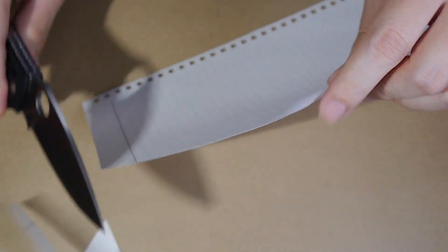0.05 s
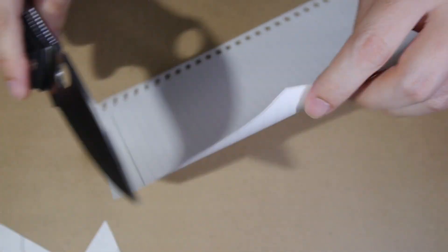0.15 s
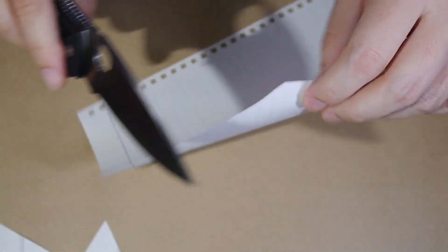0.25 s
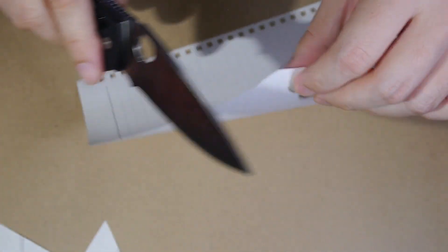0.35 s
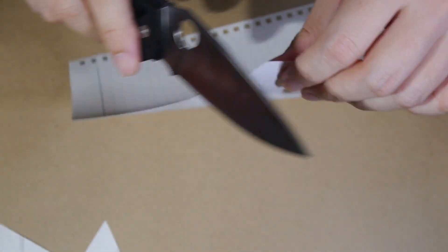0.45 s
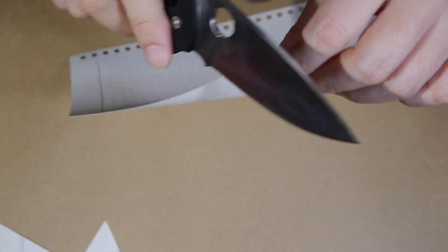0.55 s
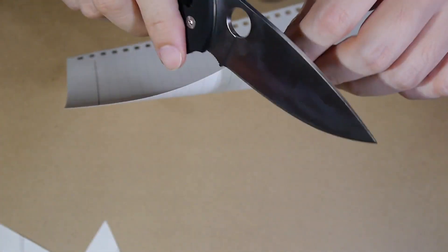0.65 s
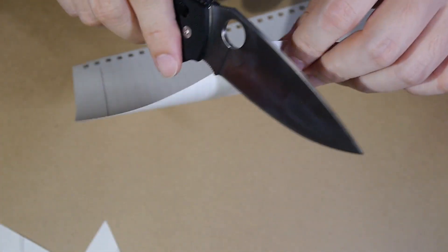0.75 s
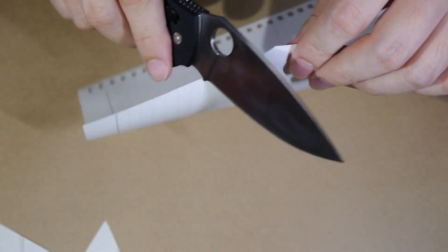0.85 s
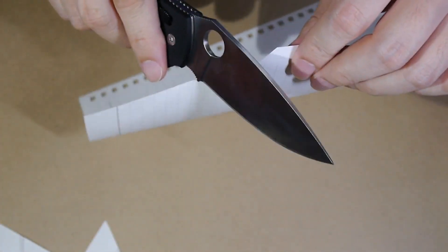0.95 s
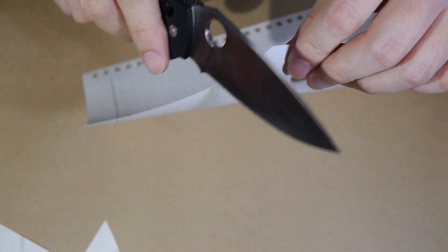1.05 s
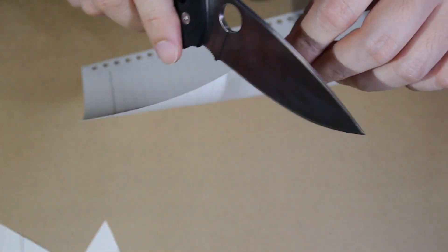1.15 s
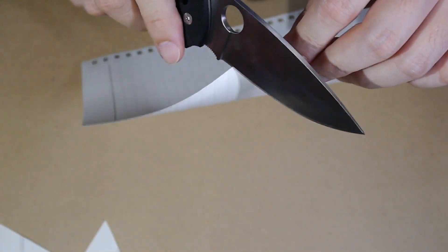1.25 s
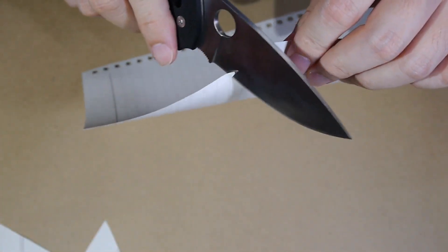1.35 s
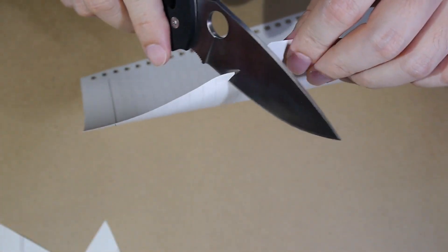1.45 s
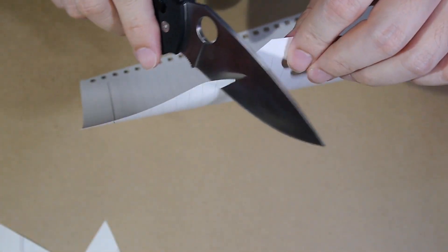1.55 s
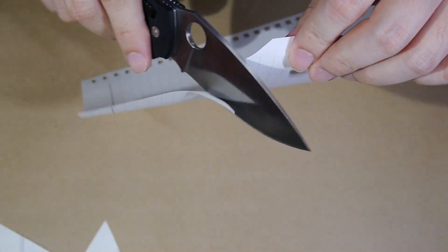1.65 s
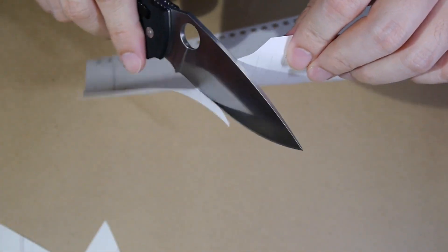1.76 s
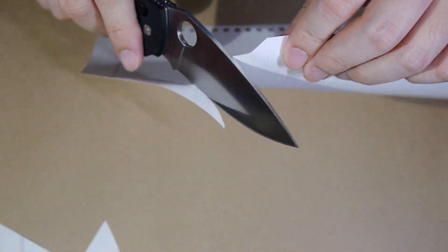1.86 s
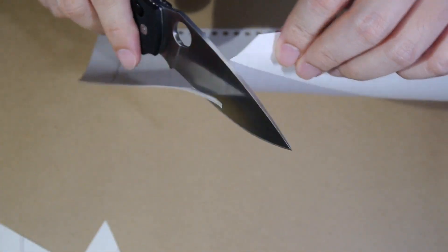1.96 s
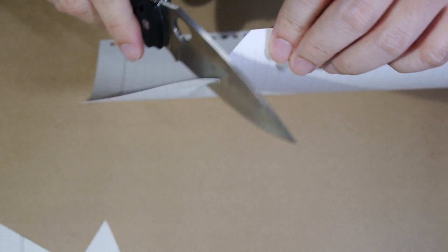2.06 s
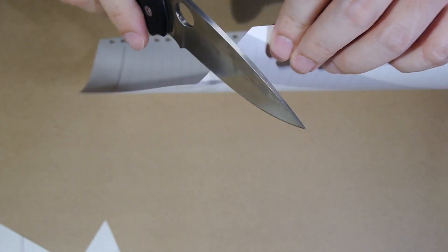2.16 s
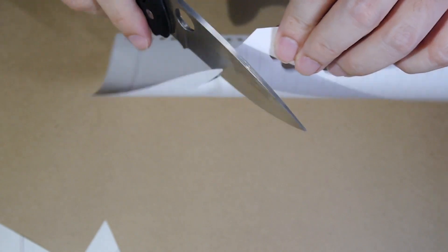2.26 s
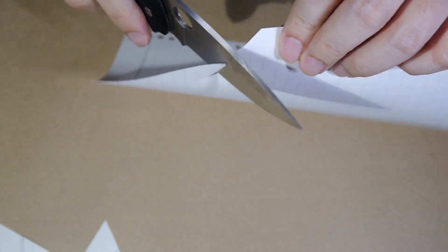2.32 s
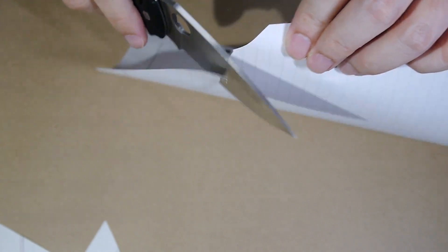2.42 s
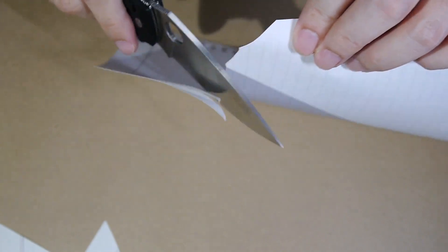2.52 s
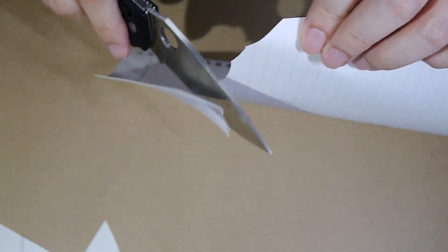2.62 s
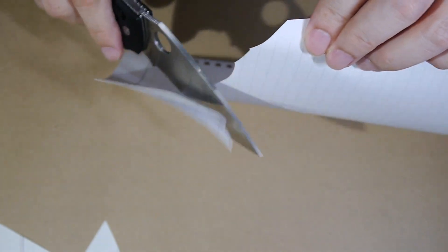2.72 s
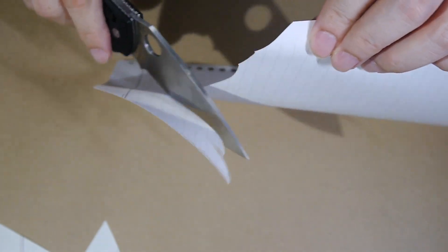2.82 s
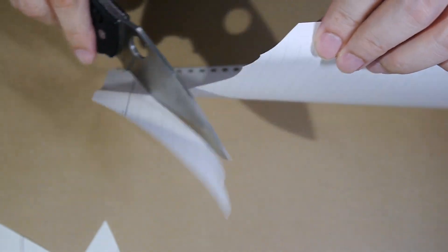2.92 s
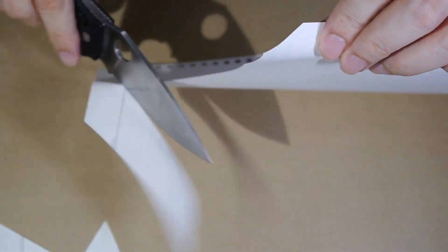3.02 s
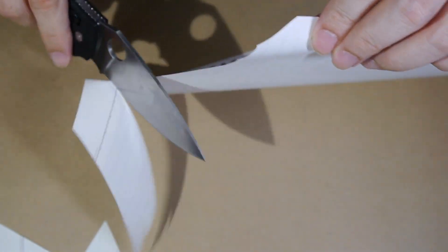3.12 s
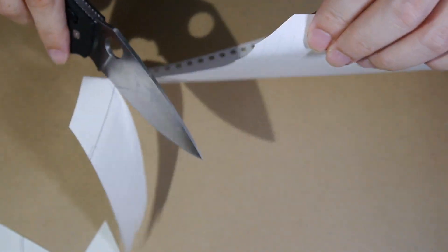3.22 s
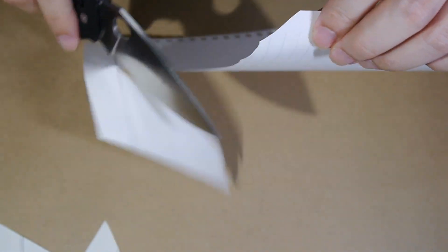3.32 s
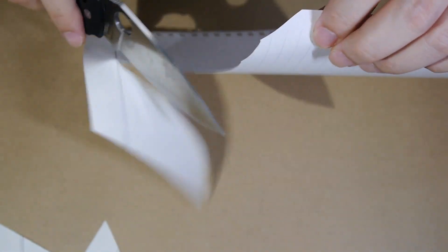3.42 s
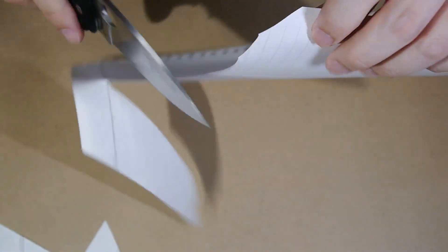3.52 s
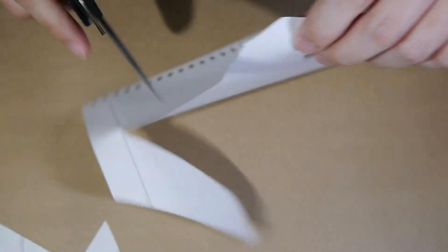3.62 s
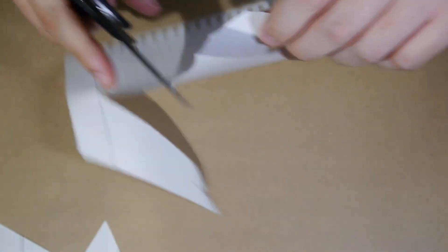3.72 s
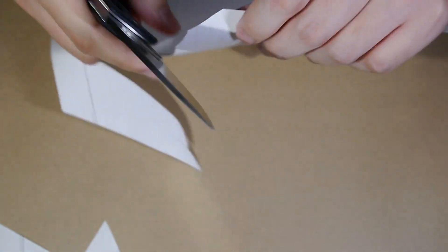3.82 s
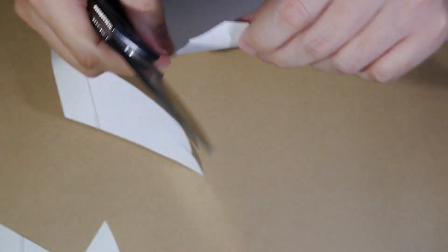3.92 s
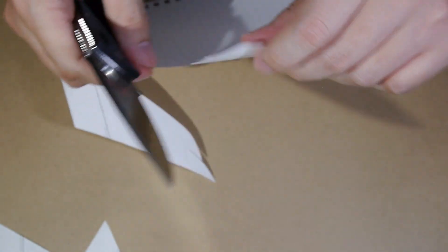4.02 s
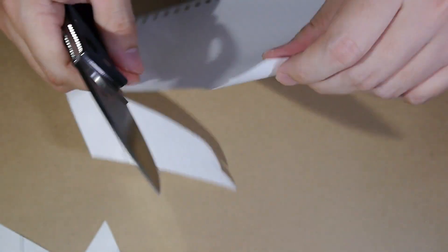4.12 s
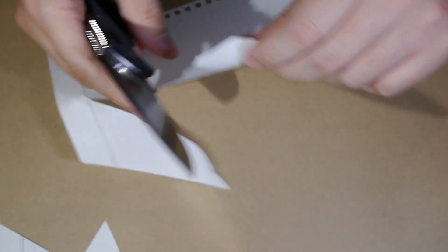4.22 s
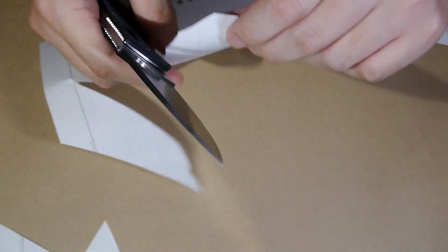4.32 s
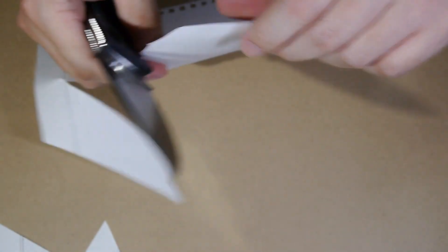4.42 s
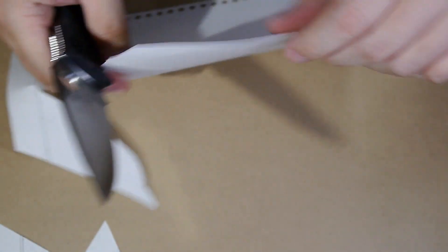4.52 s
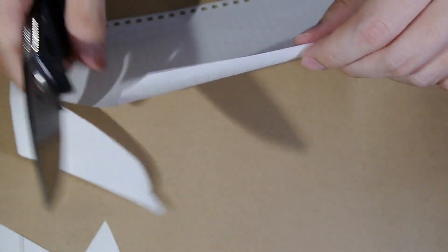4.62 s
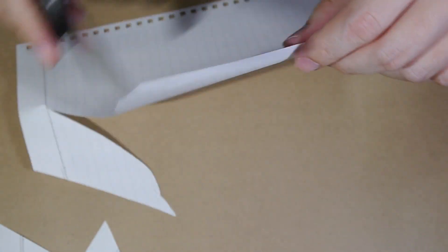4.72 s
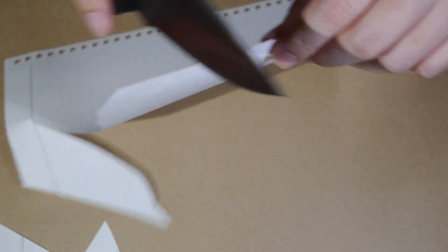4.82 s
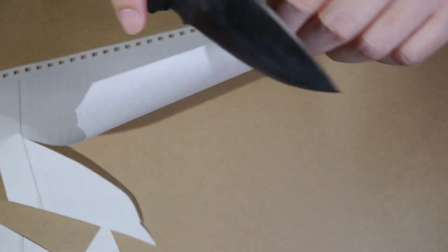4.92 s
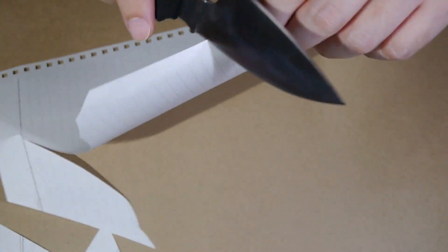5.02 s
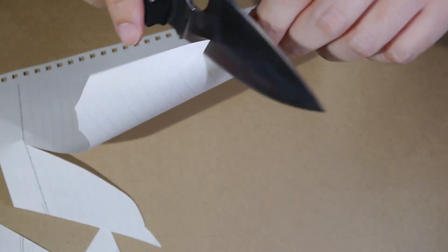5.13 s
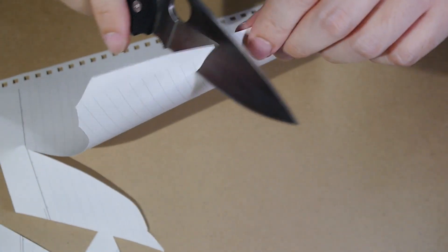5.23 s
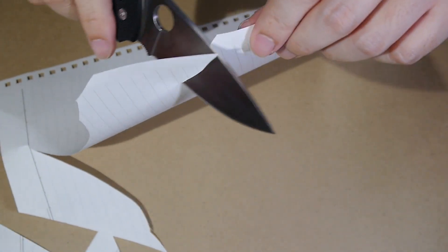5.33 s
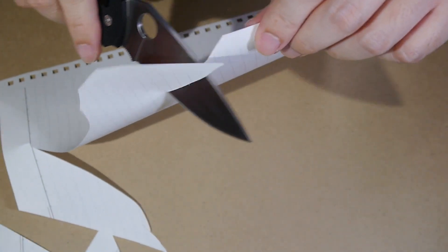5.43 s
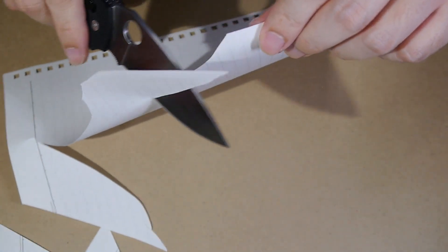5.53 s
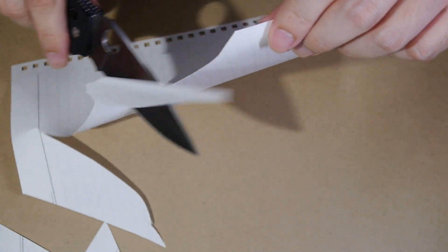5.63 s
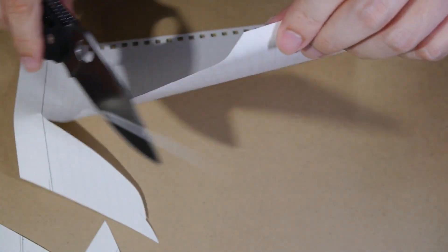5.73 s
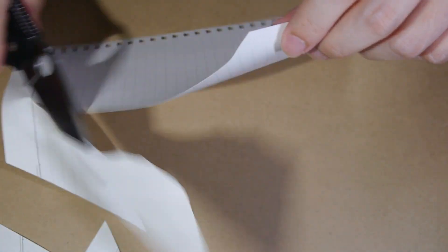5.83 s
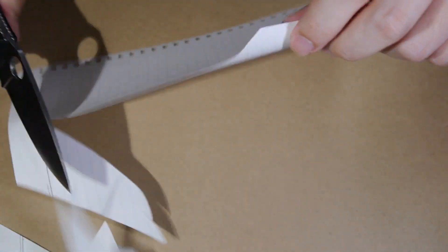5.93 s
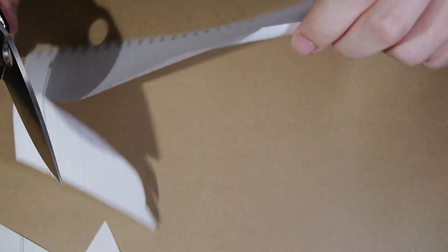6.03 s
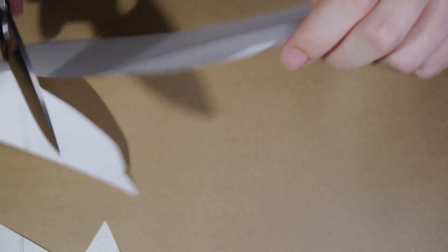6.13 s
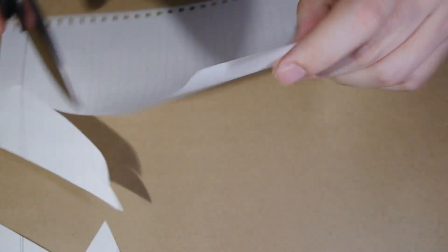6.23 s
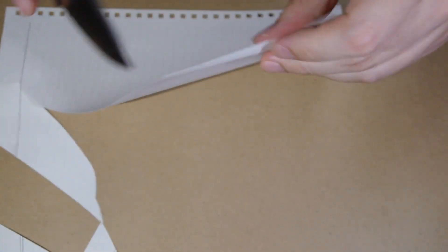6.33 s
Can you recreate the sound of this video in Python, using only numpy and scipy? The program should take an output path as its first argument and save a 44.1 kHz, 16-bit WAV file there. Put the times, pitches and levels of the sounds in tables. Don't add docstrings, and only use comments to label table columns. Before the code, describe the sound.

Dry, close stereo capture of paper being sliced indoors. Fine fibres snap so densely that each stroke becomes a rasping hiss with papery resonance and low flutter. Quiet nicks and aiming rubs come first, followed by two long cuts, a stretch of gentle finger rustling and soft bumps, then a final cut that brightens into a quick tear. Small taps and slides follow. A faint steady hum and soft room noise lie underneath.

```python
import sys
import numpy as np
from scipy import signal
from scipy.fft import rfft, irfft, next_fast_len
from scipy.io import wavfile
from scipy.ndimage import uniform_filter1d, map_coordinates

SR = 44100
rng = np.random.default_rng(int(sys.argv[2]) if len(sys.argv) > 2 else 0)


def elevation(decibels):
    levels = np.asarray(decibels, float)
    return 10 ** (levels / 20)


def log_audio(samples):
    frames = np.atleast_2d(samples).T
    limited = np.clip(frames, -1, 1)
    pcm = np.round(limited * 32767).astype(np.int16)
    wavfile.write(sys.argv[1], SR, pcm)


N = 280855

# t/s, fundamental level/dB, second harmonic level/dB
LAMP_HUM = [(0, -53, -68), (.14, -50.5, -65), (.55, -49.5, -63), (.94, -46, -52.5), (1.2, -50, -61.5),
            (1.28, -52.5, -68), (2.57, -56, -74), (3.69, -52, -76), (4.9, -52.5, -69), (6.37, -51, -69)]
# f/Hz, level/dB
AIR_COLOUR = [(12, -25), (20, -14), (50, -14.5), (85, -12), (150, -15.5), (400, -16), (800, -9.5),
              (1400, -21.5), (2500, -26), (4500, -29), (9500, -29), (13300, -36), (15300, -25.5)]
# f/Hz, side minus mid level/dB
AIR_SPREAD = [(60, -10), (300, -9), (730, -10), (1300, 1.5), (9000, -2), (15000, 2)]
# f/Hz, t60/s
ROOM_DECAY = [(200, 0.45), (2000, 0.091), (10000, 0.096)]
# f/Hz, width/Hz, level/dB
HOUSING_RESONANCES = [(1170, 150, 2), (1805, 83, 3), (2306, 217, 5), (3270, 590, -2.5), (4100, 100, 3),
                      (4960, 250, 6), (6160, 260, 1), (8300, 490, 1.5), (11380, 180, 1),
                      (1387, 270, -8), (2070, 110, 1), (2680, 130, -2), (3570, 240, -3.5), (4760, 140, -0.5),
                (5470, 150, 0)]
# f/Hz, side minus mid level/dB
PAPER_SPREAD = [(60, -8), (450, -16), (1200, -14.5), (2000, -10.5), (3300, -9.5), (5000, -9.5),
                (6200, -9.5), (9000, -12.5), (10500, -10.5), (13000, -2), (15000, 4)]
# f/Hz, left minus right level/dB
PORT_TILT = [(60, -1.5), (300, 0.5), (1200, -1.6), (3000, -1.8), (8000, -0.9), (13000, -0.7)]
# t/s, treble width level/dB
TREBLE_WIDTH = [(1.6, 1), (1.8, -8), (2.05, 2), (2.6, -4.5), (3.35, -8), (3.6, -5), (5.15, -2.5), (5.3, -3),
                (5.9, -10), (5.97, 3)]

# f/Hz, level/dB per Hz
FLAP_COLOUR = [(30, -70), (68, -18), (115, -4), (124, -7), (329, -6), (500, -5.5), (650, -2.5),
               (1100, -120)]
BEND_COLOUR = [(200, -19), (350, -20.5), (700, -2), (1150, -2), (1450, -2), (1800, -11), (3300, -120)]
RASP_COLOUR = [(760, -57), (1200, -14), (1450, 0.5), (2400, -2.5), (3500, 0), (4300, -16.5), (8000, -120)]
FIBRE_COLOUR = [(1880, -15.5), (3200, -0.5), (3700, -1.5), (4950, -4.5), (5390, -2.5), (7000, -5.5),
                (9100, -20), (15400, -120)]
EDGE_COLOUR = [(3530, -32), (6000, -5.5), (8050, -3.5), (9630, -2.5), (11400, -8), (13400, -18),
               (15300, -26)]

# t/s, peak level/dB, pitch f/Hz, crack level/dB, upper bends level/dB
EDGE_TAPS = [(0.169, -32.5, 670, 0.5, -12), (0.201, -28.5, 1390, -14, -7), (0.384, -22.5, 1200, -25, -17),
             (0.813, -22, 940, -39, -17), (1.116, -25, 1300, -10, 10.5), (1.335, -17, 917, -31, -3),
             (2.311, -27, 2380, -6, 5), (2.35, -20, 1140, -13, -15), (2.47, -13, 2380, -18, -4),
             (2.477, -17, 2370, -14, 5), (3.204, -22.5, 890, -13, -21), (3.401, -31.5, 610, 7, -15),
             (3.870, -24.5, 450, -15, -20), (3.951, -29, 427, -13, -17), (4.0, -29.5, 450, -13, -14),
             (4.496, -30.5, 1500, -14, -10), (4.529, -33, 2300, -0.5, -12), (4.683, -31, 1140, -4, -8),
             (4.673, -29, 1140, -9, -13), (5.125, -16, 755, -28, -1), (5.134, -33, 900, -13, -10),
             (6.047, -23, 2300, -17, -7), (6.112, -21, 645, -9, -16), (6.1367, -17.5, 2460, -20, -20),
             (6.296, -23, 1050, -21, -10), (6.306, -20, 1000, -22, -16)]
# t/s of peak, hiss level/dB, load
# level/dB, rise/s, fall/s
SHEET_SLIDES = [(.128, -41, -17, 0.043, 0.043), (.175, -42.5, -0.5, 0.014, 0.03),
                (.203, -44.5, 1.5, .008, 0.061), (.305, -40, -4, 0.11, 0.095),
                (.383, -40.5, -5, 0.041, 0.24), (.459, -42, -26, 0.17, 0.065), (.72, -56, 0, 0.93, 0.055),
                (1.1, -43, -15, 0.055, 0.21), (1.123, -42, 13.5, 0.028, 0.03),
                (1.21, -48, 0.5, 0.095, 0.022), (1.342, -50, 11, 0.0048, 0.041),
                (2.0, -42.5, -11, 0.34, 0.047), (2.111, -48, -7.5, 0.14, 0.11),
                (2.191, -46.5, -4.5, 0.099, 0.12), (2.298, -47.5, 12, .008, .05),
                (2.322, -31, -2.5, 0.033, 0.041), (2.38, -41.5, -14, 0.037, 0.14),
                (3.212, -31, -11, 0.041, 0.07), (3.25, -42, -6, .05, 0.47),
                 (3.407, -37, 1.5, 0.0082, 0.015), (3.423, -53, 8.5, .02, 0.15),
                 (3.6, -45.5, -11, 0.054, 0.47), (3.781, -32.5, -18, 0.16, 0.26),
                 (3.874, -53, 11.5, 0.012, 0.55), (3.987, -47, -1, 0.49, .33), (4.163, -55, 8.5, .01, 0.17),
                 (4.237, -39.5, -17, 0.12, 0.13), (4.321, -44.5, -5.5, 0.083, 0.16),
                 (4.397, -41, -19, 0.078, 0.16), (4.455, -45, -0.5, 0.076, 0.047),
                 (4.525, -36.5, -13, 0.054, 0.18), (4.6, -40.5, -20, 0.11, 0.17),
                 (4.676, -46, 5.5, 0.028, 0.06), (4.695, -42, -9, 0.26, 0.033), (4.74, -49, -4, .05, 0.14),
                 (4.779, -58.5, 11, 0.2, 0.059), (4.89, -47, -2.5, 0.11, 0.4),
                 (5.02, -44.5, -8.5, 0.22, 0.13), (5.133, -44, 15, 0.0056, 0.019)]
# t/s of peak, hiss level/dB, load level/dB, rise/s, fall/s
SETTLING_SLIDES = [
    (3.125, -28, 6, 0.03, 0.033),
    (5.922, -21.5, -16, 0.033, 0.027),
    (6.0, -45.5, -1, 0.044, 0.12),
    (6.064, -41, -11, 0.025, 0.48),
    (6.116, -41, 6.5, .015, 0.045),
    (6.143, -34.5, -4.5, 0.013, 0.092),
    (6.246, -38, -22, .08, 0.076),
    (6.299, -47.5, 15.5, 0.022, 0.071),
    (6.362, -40, 3, .08, 0.024),
]
# t/s, blade speed as hiss level/dB, sheet load level/dB, tension level/dB
SHORT_STROKES = [
    [(0.0, -21, -13.5, 3), (0.02, -22.5, -12, -4.5), (0.048, -43.5, -8, -3), (0.058, -39.5, 7, -7),
     (0.1, -64, -4, 2)],
    [(0.812, -51, 18, -4), (0.824, -46.5, 5, -5), (0.892, -41, 9, 4), (1.016, -43.5, 8, -0.5),
     (1.04, -47, 6.5, -2), (1.066, -64, 11, 2), (1.075, -50, 3, 0.1)],
]
# t/s, blade speed as hiss level/dB, sheet load level/dB, tension level/dB
LONG_SLICES = [
    [(1.37, -54, -11, 1), (1.41, -31.5, -0.5, -3), (1.442, -30.5, -4, 1.5), (1.502, -35, 0.5, 0.2),
     (1.744, -27.5, -5.5, 1.1), (1.78, -31, -2.5, -11), (1.822, -27, -4.5, -10), (1.858, -37.5, -6, -4),
     (1.96, -47, -4, -6)],
    [(2.415, -59, -11, -4), (2.423, -34, 0, -3.5), (2.451, -28, -8, 3.2), (2.743, -26.5, -8, -2),
     (2.803, -34, -3, 4), (2.827, -27.5, -9, -1), (2.949, -31, -5, 2.3), (3.123, -22.5, -6.5, -3),
     (3.19, -43.5, -7, -8)],
    [(5.14, -49, 4, -2), (5.146, -39.5, -1, -7), (5.172, -29.5, -6.5, -2.3), (5.292, -24.5, -4, 0.9),
     (5.582, -27.5, -3.5, 2.8), (5.606, -28, -1.5, 0.5), (5.926, -19, -17.5, -2.5), (5.974, -51.5, 6, -8),
     (5.99, -50.5, 2, -7)],
]

LAYER_LOAD = [1.0, 0.57, 0.17, 0.053]
LAYER_TENSION = [0.14, 0.94, 0.35, 0]
CUT_LAYERS = [0.53, -1.02, -2.1, -0.8]
SLIDE_LAYERS = [-0.93, -2.5, -3.5, -0.8]

CURL_TIMES = [0, .1, .8, 1.08, 1.36, 1.6, 1.78, 2.28, 2.41, 2.62, 2.86, 3.03, 3.19, 3.65, 4.15, 4.48, 4.82,
              5.14, 5.36, 5.56, 5.8, 5.89, 5.99, 6.4]
# f/Hz, width/Hz, level/dB
FIRST_CURLS = [
    [(2300, 1200, 1.5), (8000, 1800, 3.5)],
    [(1200, 500, 4), (3000, 1200, 2.4), (6000, 2000, 0)],
    [(910, 170, 1), (1630, 230, 2), (2300, 150, 3.5), (3400, 400, 4.5), (4540, 150, 7), (4970, 250, 2.5)],
    [(1500, 400, 3.5), (2030, 330, 6), (3080, 1200, 1.5), (5100, 480, -1)],
    [(795, 260, -1.1), (1060, 200, 3.5), (1680, 200, 2.5), (2300, 140, 7.5), (3360, 220, 3),
     (3870, 400, -2), (5000, 400, 4.5)],
    [(810, 260, 1), (1100, 170, 1.5), (1710, 220, 4), (2310, 200, 5), (3400, 200, 3), (3830, 300, -13),
     (5700, 600, 2), (8650, 1500, 2.5)],
    [(1080, 200, 8), (1710, 200, 3.8), (2300, 160, 3.5), (3850, 270, 0), (5050, 230, 2), (6800, 250, -3.5),
     (8300, 900, 0.5)],
    [(1000, 300, 3), (2380, 250, 8.5), (3200, 320, 0.5)],
]
# f/Hz, width/Hz, level/dB
MIDDLE_GRIP_CURLS = [
    [(1000, 230, 6.5), (1730, 220, 6.5), (2380, 120, 7), (3230, 300, 5.5), (3700, 400, -4),
     (4960, 230, 1.1), (8800, 1200, 4.5)],
    [(600, 300, 1.5), (1140, 170, 5), (1750, 210, 1.5), (2380, 140, 6), (3600, 400, -6.5),
     (5030, 230, -3.5), (7950, 540, 6.5)],
    [(600, 400, 1.5), (1150, 250, -1.5), (1770, 280, 4.5), (2340, 300, -3.5), (4520, 420, 1.5),
     (6250, 700, 4.5)],
    [(606, 400, -2), (1100, 210, -1.5), (1750, 410, 4), (2930, 500, -1.5), (4480, 1100, 4.5),
     (4950, 200, -1), (7300, 650, 1.5)],
    [(900, 240, 1.5), (2460, 900, 0), (3970, 900, 3), (6270, 300, 0.5), (8600, 900, 0.5)],
    [(450, 150, 7.5), (1140, 200, 2), (3150, 450, 3), (6200, 220, 4), (9400, 1200, 1.5)],
    [(450, 140, 8), (1140, 200, -1.5), (2250, 300, 3), (3150, 400, 6), (6100, 220, 8), (8600, 900, -2)],
    [(1140, 200, -2), (3100, 460, 4), (4450, 440, 0), (6160, 170, 4.5), (8700, 900, -2.5)],
    [(800, 300, -3), (2770, 600, 2), (6200, 300, -4), (8600, 900, -2)],
]
# f/Hz, width/Hz, level/dB
LAST_CUT_CURLS = [
    [(777, 250, -4), (1200, 200, 5), (1760, 140, 4.5), (2380, 200, 5.5), (3000, 710, 2.5), (4920, 140, -1),
     (7500, 780, 3)],
    [(770, 190, -7.5), (1140, 150, 2), (1700, 180, 1), (2280, 320, -0.5), (2900, 620, 3), (5000, 130, 1),
     (7500, 900, 2.3)],
    [(790, 170, -11.5), (1160, 62, 6), (1600, 400, -1.5), (2900, 540, 3.5), (4070, 120, 4.5),
     (5020, 200, 3.5), (9000, 1200, 1)],
    [(1050, 130, 6), (1500, 460, -4.5), (2100, 580, 3.5), (3400, 1100, -3), (5060, 300, 0), (8500, 1700, 5)],
    [(1500, 500, -1), (2430, 1100, 6), (4300, 770, -4.5), (5150, 570, -1), (7600, 770, 6.5)],
    [(637, 150, 0), (1050, 220, 0.5), (3100, 440, 0.5), (6000, 2000, -2.9)],
]


def unit(x):
    return x / np.sqrt(np.mean(x ** 2) + 1e-20)


def along(points, hz):
    f, v = np.transpose(points)
    return np.interp(np.log(hz + 1), np.log(f + 1), v)


def curves(rows):
    s, *cols = np.transpose(rows)
    return [np.interp(np.arange(N) / SR, s, c) for c in cols]


def wobble(rate):
    knots = rng.standard_normal(int(N * rate / SR) + 4)
    return map_coordinates(knots, [np.arange(N) * rate / SR])


def filtered(x, response):
    m = next_fast_len(N + 8192)
    return irfft(rfft(x, m) * response(np.fft.rfftfreq(m, 1 / SR)), m)[..., :N]


def shaped(hz, peaks):
    gain = 1
    for centre, width, db in peaks:
        band = 1j * hz * width / (centre ** 2 - hz ** 2 + 1j * hz * width)
        gain = gain * (1 + (elevation(db) - 1) * band)
    return gain


def patches(x, size, depth_db, span):
    z = signal.stft(x, nperseg=size)[2]
    field = uniform_filter1d(rng.standard_normal(z.shape[1:]), size=span[0], axis=0)
    field = uniform_filter1d(field, size=span[1], axis=1)
    return signal.istft(z * elevation(depth_db * unit(field)), nperseg=size)[1][:, :N]


def hum():
    hum_hz = 99.3
    first_db, second_db = curves(LAMP_HUM)
    second_db = second_db + 0.75 * wobble(3.7)
    turn = 2 * np.pi * hum_hz * np.arange(N) / SR + 0.3 * wobble(5.5)
    first = elevation(first_db + 0.53 * wobble(7.9)) * np.sin(turn)
    second = elevation(second_db) * np.sin(2 * turn)
    return np.sqrt(2) * (first + second)


def air():
    def colour(hz):
        return elevation(along(AIR_COLOUR, hz) + np.outer([0, 1], along(AIR_SPREAD, hz)))

    pair = filtered(rng.standard_normal((2, N)), colour)
    return elevation(-54.0) * pair / np.std(pair[0])


def room(pair):
    hz, t, z = signal.stft(rng.standard_normal((2, SR // 3)), SR, nperseg=256)
    decay = elevation(-60 * t / along(ROOM_DECAY, hz)[:, None])
    tail = signal.istft(z * decay, SR, nperseg=256)[1]
    late = np.pad(pair, ((0, 0), (300, 0)))
    return signal.fftconvolve(late, tail / np.linalg.norm(tail[0]), axes=1)[:, :N]


def housing(hz):
    return shaped(hz, HOUSING_RESONANCES)


def centred(side):
    treble = filtered(side, lambda hz: (hz > 5300) & (hz < 9600))
    return side + (elevation(np.minimum(curves(TREBLE_WIDTH)[0], 0)) - 1) * treble


def ports(mid, side):
    pair = np.array([mid + side, mid - side])
    return filtered(pair, lambda hz: elevation(np.outer([.5, -.5], along(PORT_TILT, hz))))


def flapping(bend):
    flap_db, taut_limit_db = -4, -50.5
    puff_db, puff_per_tap_db, puff_t60_s = -35, 0.34, 0.055
    puffs = filtered(rng.standard_normal((2, N)), lambda hz: elevation(along(FLAP_COLOUR, hz)))
    swing = elevation(flap_db) * bend
    swing = swing / np.hypot(1, swing / elevation(taut_limit_db))
    pushes, t = np.zeros(N), np.arange(SR // 5) / SR
    tap_samples = [round(row[0] * SR) for row in EDGE_TAPS]
    pushes[tap_samples] = elevation(puff_db + puff_per_tap_db * np.array(EDGE_TAPS)[:, 1])
    decay = elevation(-60 * t / puff_t60_s) * (1 - np.exp(-t / 0.0034))
    after = signal.fftconvolve(pushes, decay)[:N]
    return swing * unit(puffs * elevation(2.5 * wobble(25))) + after * unit(puffs)


def taps():
    push_s, tail_t60_s, sweep_s = 0.0048, 0.054, 0.00118
    bends, cracks = np.zeros((2, 2, N + SR))
    t = np.arange(SR // 10) / SR
    push = np.sin(np.pi * np.clip(t / push_s, 0, 1)) ** .5
    tail = elevation(-60 * t / tail_t60_s) * (1 - np.exp(-t / 0.0027))
    swept_t = t + sweep_s * (1 - np.exp(-t / sweep_s))
    upper = np.sin(2 * np.pi * 1700 * t) + 0.26 * np.sin(2 * np.pi * 2350 * t)
    for s, db, hz, crack_db, upper_db in EDGE_TAPS:
        noise = rng.standard_normal((4, len(t)))
        ring = [1, -1.8 * np.cos(2 * np.pi * hz / SR), .9 ** 2]
        rough = signal.lfilter([1, 0, -1], ring, noise[:2])
        bend = 0.39 * np.sin(2 * np.pi * hz * swept_t) + 0.39 * elevation(upper_db) * upper
        here = slice(round(s * SR), round(s * SR) + len(t))
        bends[:, here] += elevation(db) * (bend * push + 0.17 * unit(rough) * tail)
        cracks[:, here] += elevation(db + crack_db) * (0.88 * push + 0.33 * tail) * noise[2:]

    def bright(hz):
        return 1j * hz * 6000 / (8000 ** 2 - hz ** 2 + 1j * hz * 6000)

    return 1.02 * bends[:, :N] + filtered(cracks[:, :N], lambda hz: bright(hz) ** 2)


def contact():
    ease = 1.1
    t = np.arange(0, N / SR + .001, .001)
    share, power = np.array(LAYER_LOAD)[:, None], 1e-12
    for s, hiss_db, load_db, tension_db in map(np.transpose, SHORT_STROKES + LONG_SLICES):
        level_db = np.interp(t, s, hiss_db, left=-120, right=-120) + share * np.interp(t, s, load_db)
        taut_db = np.c_[LAYER_TENSION] * np.interp(t, s, tension_db)
        power = power + elevation(level_db + taut_db + np.c_[CUT_LAYERS]) ** 2
    for s, hiss_db, load_db, rise, fall in SHEET_SLIDES + SETTLING_SLIDES:
        away = np.where(t < s, (s - t) / rise, (t - s) / fall)
        level_db = hiss_db - 20 * away ** ease + share * load_db
        power = power + elevation(level_db + np.c_[SLIDE_LAYERS]) ** 2
    return [np.interp(np.arange(N) / SR, t, gain) for gain in np.sqrt(power)]


def snaps(spectrum, spread_db, patchy_db, clump_db, modes_db):
    clumps = elevation(clump_db * wobble(260) + 0.51 * clump_db * wobble(60))
    sizes = np.minimum(rng.exponential(size=(2, N)), 4)
    grains = rng.standard_normal((2, N)) * elevation(spread_db * sizes) * clumps
    drifting = patches(grains, size=256, depth_db=patchy_db, span=(5, 18))
    ringing = patches(drifting, size=2048, depth_db=modes_db, span=(2, 12))
    return unit(filtered(ringing, lambda hz: elevation(along(spectrum, hz))))


def cutting(gains):
    small_hz = 264
    bend = gains[0] * snaps(BEND_COLOUR, spread_db=3.0, patchy_db=1.0, clump_db=1.44, modes_db=2.06)
    rasp = gains[1] * snaps(RASP_COLOUR, spread_db=3.0, patchy_db=1.0, clump_db=1.35, modes_db=3.0)
    fibre = gains[2] * snaps(FIBRE_COLOUR, spread_db=3.0, patchy_db=1.2, clump_db=0.38, modes_db=3.5)
    edge = gains[3] * snaps(EDGE_COLOUR, spread_db=2.5, patchy_db=1.6, clump_db=0.48, modes_db=3.0)
    return elevation(-1.5) * filtered(bend + rasp + fibre + edge, lambda hz: 1j * hz / (small_hz + 1j * hz))


def curled(x):
    t, m = np.arange(N) / SR, next_fast_len(SR)

    def fade(s):
        return np.clip((t - s) / .016 + 1, 0, 1)

    hz, out = np.fft.rfftfreq(m, 1 / SR), np.zeros((2, N + m))
    all_curls = FIRST_CURLS + MIDDLE_GRIP_CURLS + LAST_CUT_CURLS
    for start, stop, peaks in zip(CURL_TIMES, CURL_TIMES[1:], all_curls):
        first = max(round(start * SR) - 1000, 0)
        part = (x * (fade(start) - fade(stop)))[:, first:first + m]
        out[:, first:first + m] += irfft(rfft(part, m) * shaped(hz, peaks), m)
    return out[:, :N]


def scene():
    def path(hz):
        return housing(hz) * elevation(np.outer([0, 1], along(PAPER_SPREAD, hz)))

    gains = contact()
    paper = curled(cutting(gains)) + flapping(gains[0]) + taps()
    paper = filtered(paper, path)
    mid, side = paper + elevation(-14.0) * room(paper)
    return ports(*(np.array([mid, centred(side)]) + air())) + hum()


def low_pass(x):
    return signal.sosfilt(signal.butter(12, 15440, fs=SR, output="sos"), x)


def record(dry):
    mix = dry - .0034
    return low_pass(mix)


dry = scene()
out = record(dry)
log_audio(out)
```